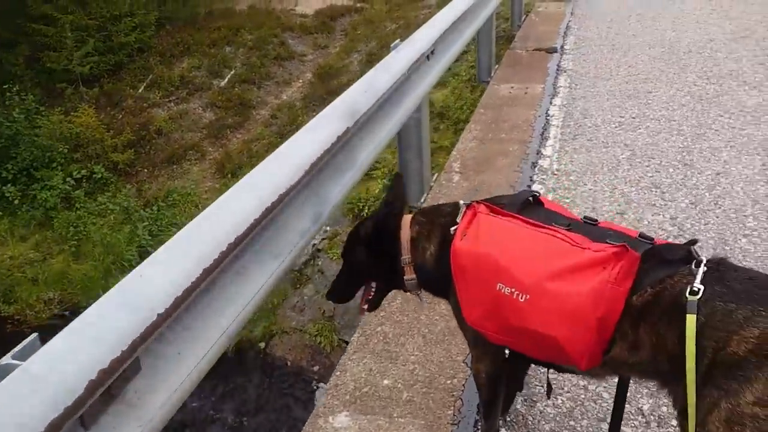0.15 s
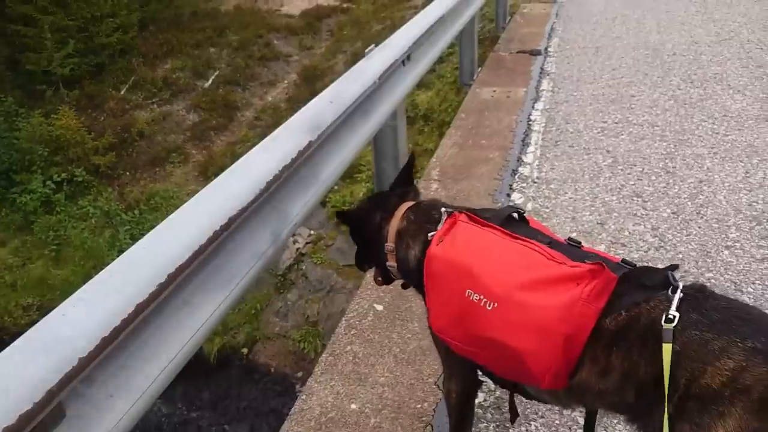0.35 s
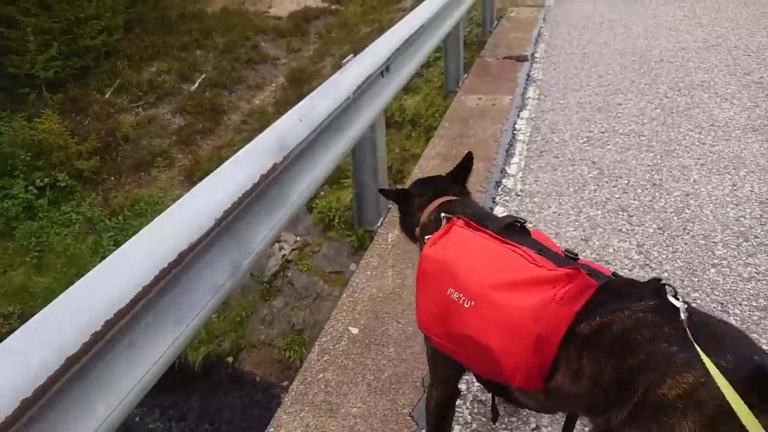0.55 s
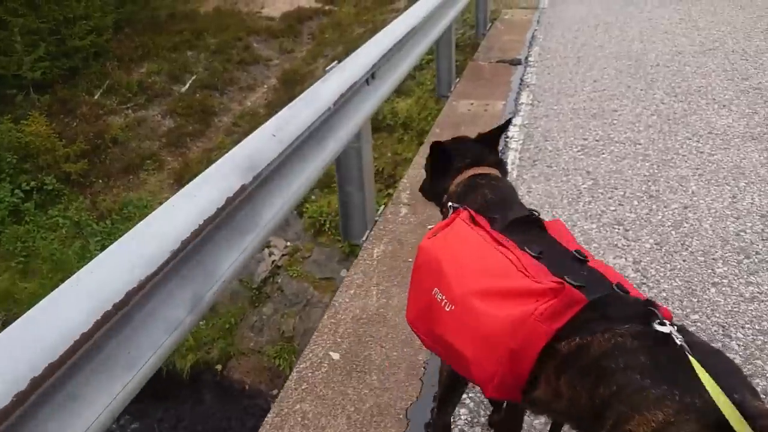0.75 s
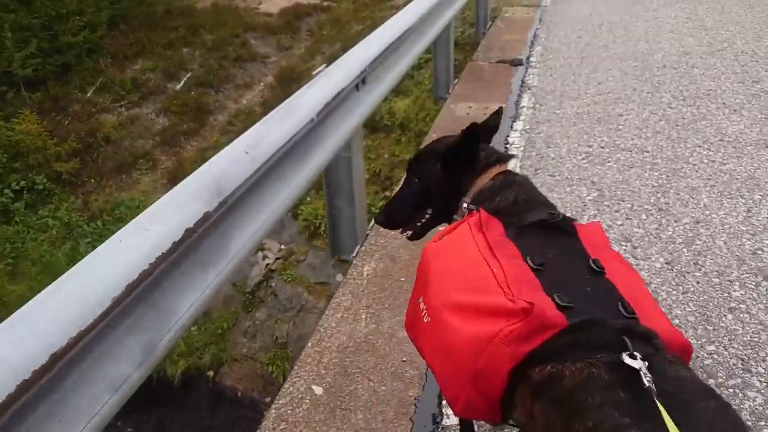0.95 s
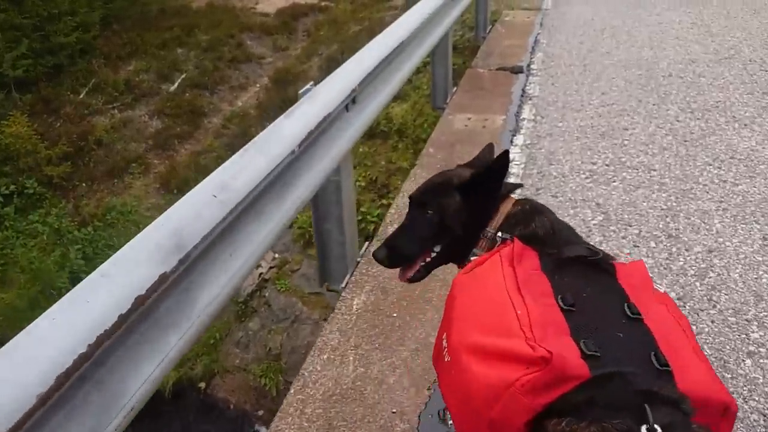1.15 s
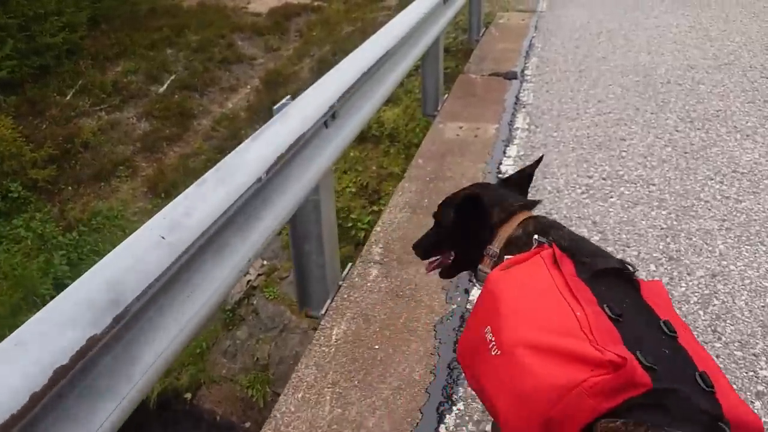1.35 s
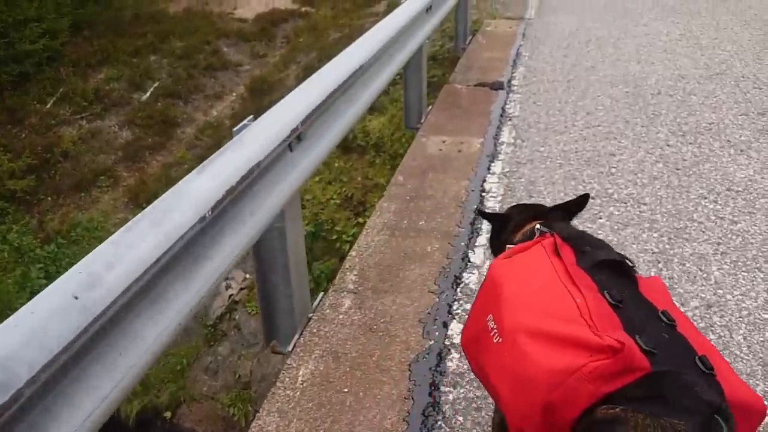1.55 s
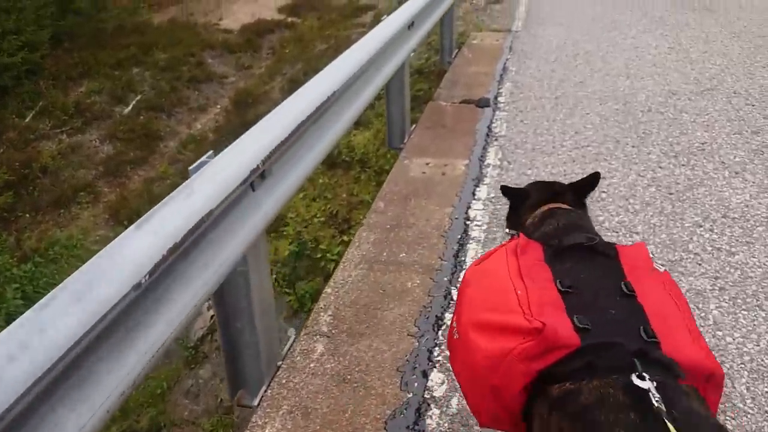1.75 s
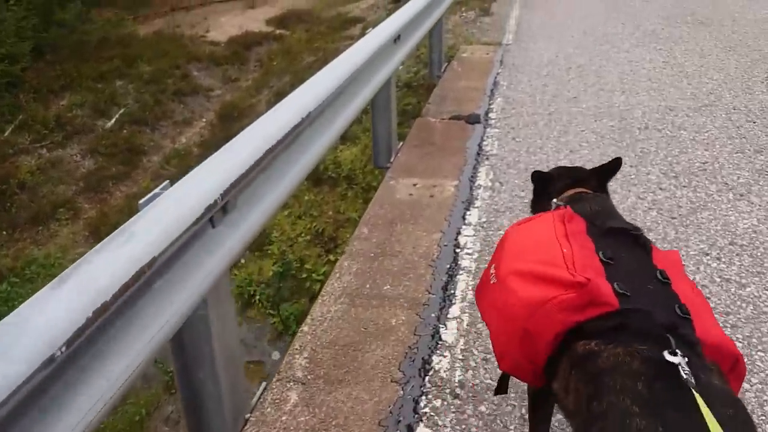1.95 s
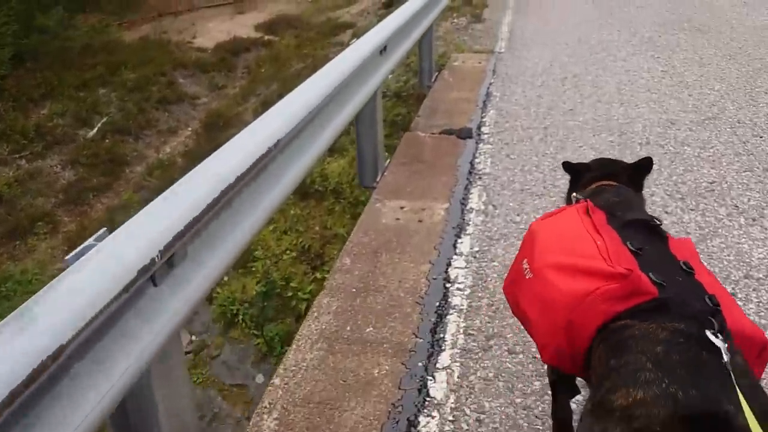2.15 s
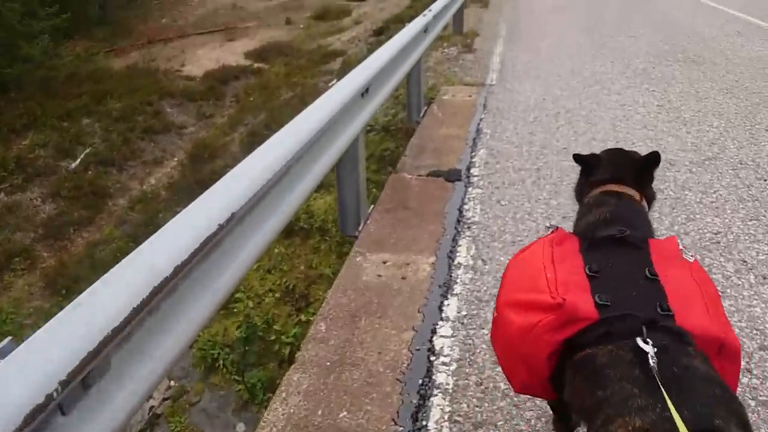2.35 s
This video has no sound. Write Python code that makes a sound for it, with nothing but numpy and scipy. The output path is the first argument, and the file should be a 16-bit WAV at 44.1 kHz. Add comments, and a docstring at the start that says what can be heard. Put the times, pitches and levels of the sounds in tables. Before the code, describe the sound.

A plastic leash ratchet rattles close on the right, then snaps once, over a quiet rushing stream

```python
"""A small stream rushes over stones below a roadside, left of a hand-held stereo microphone.
Its wash is patchy noise that reaches the left port first, with ringing bubbles and gulps of air.
Close on the right a plastic ratchet, probably the reel of a dog leash, rattles in two quick runs:
noise snaps, a ringing pawl and a knocked shell. Later its catch snaps once, with two early echoes.
Soft low bumps (damped tones) and faint rustles (treble puffs) come from walking and handling."""
import sys
import numpy as np
from scipy import signal
from scipy.fft import rfft, irfft
from scipy.io import wavfile
from scipy.ndimage import uniform_filter1d

SR = 44100
rng = np.random.default_rng(int(sys.argv[2]) if len(sys.argv) > 2 else 0)


def digitize_waveform(pressure):
    """Quantize a signal to 16-bit integers and store it at the path in sys.argv[1].

    Rows of a 2-D input are taken as channels; values are limited to [-1, 1].
    """
    field = np.atleast_2d(pressure).T
    bounded = np.clip(field, -1, 1)
    quanta = np.round(bounded * 32767).astype(np.int16)
    wavfile.write(sys.argv[1], SR, quanta)


N = 105840

# Stream spectrum at the microphone. Each row: frequency in Hz, relative level left in dB, right in dB.
STREAM_SPECTRUM = [(20, -5.5, -8), (50, -16, -6), (101, -25.5, -24.5), (170, -48, -38), (261, -12.5, -6.5),
                   (331, -2, 2.5), (478, -10, -4.5), (820, -1.5, -4), (1050, -9, -6.5), (1490, -7, -4.5),
                   (2410, -10, -8), (2920, -22, -10.5), (4100, -15, -11), (6140, -18.5, -17),
                   (6840, -64, -16), (7350, -27, -18.5), (8040, -32.5, -26.5), (8770, -23, -24.5),
                   (12500, -20.5, -23.5), (15800, -23, -26)]
# Swell of the water as the walker moves. Each row: time in seconds, gain in dB.
WATER_SWELL = [(0, 0), (.5, 1.5), (.65, -0.5), (1.05, -0.3), (1.35, 0.3), (1.5, 0.5), (1.74, 2.5),
               (1.85, 0.7), (2.05, 0.5), (2.25, 0.9), (2.4, -1.1)]
# Likeness of the stream at the two ports. Each row: frequency in Hz, likeness from 0 to 1.
PORT_LIKENESS = [(60, 0.02), (140, 0.54), (300, 0.93), (650, 0.55), (1400, 0.41), (3000, 0.35), (7000, 0),
                 (15000, 0)]
# Depth of the churning patches. Each row: frequency in Hz, depth in dB per standard deviation.
CHURN_DEPTH = [(50, -2), (350, 2), (900, 2.2), (2500, 1.4), (8000, 2.06), (15000, 3.3)]
STREAM_DB, STREAM_LEAD_S = -46, 0.00041  # the stream lies left: its left port leads

BUBBLES_PER_S, BUBBLE_CYCLES = 70, 14  # births over all sizes; cycles to age 1
BUBBLES_DB = -57

# Soft bumps of steps and handling.
# Each row: start in seconds, pitch in Hz, level at the right port in dB, fade time constant in seconds.
SOFT_BUMPS = [(0.171, 129, -41.5, 0.0093), (0.226, 141, -48.5, 0.021), (0.462, 96, -53, 0.009),
              (1.449, 155, -51.5, 0.0066), (1.512, 126, -50, 0.0081), (2.041, 174, -43, 0.016),
              (2.058, 116, -44.5, 0.0069), (2.095, 208, -47.5, 0.0093), (2.249, 48.5, -47.5, 0.022)]
BUMP_RISE_S, BUMP_LEFT_DB = 0.0083, -8

# Ratchet teeth. Each row: start in seconds, snap level in dB, knock level in dB re KNOCK_DB,
# extra treble in dB, pitch of the pawl's ring in Hz.
RATCHET_TEETH = [(.179, -19.5, -33, -14, 1360), (.208, -19, -16, -10, 1390), (0.2188, -23, -23, -18, 1340),
                 (0.2349, -15, -18, -7, 1340), (0.2426, -17.5, -32, -16, 1380),
                 (0.2551, -14.5, -16.5, -4.5, 1280), (0.2626, -20, -25, -8, 1280),
                 (.2733, -13.5, -16.5, -11, 1390), (0.2791, -21.5, -19.5, -7, 1280),
                 (0.2892, -18.5, -13.5, 4, 1410), (0.2967, -36, -37, -3, 1280),
                 (.304, -15.5, -19, -1, 1290), (0.317, -18.5, -14.5, 4.5, 1360),
                 (0.321, -22.5, -18, -6, 1660), (0.329, -19, -18, -14, 1430), (0.332, -24, -22.5, -4, 1430),
                 (.3405, -18, -22.5, -22, 1320), (.351, -15.5, -16.5, -1.5, 1430),
                 (.3606, -15.5, -14, -7, 1490), (0.3695, -15, -17, 7.5, 1375),
                 (0.3783, -12.5, -20, 3, 1510), (0.3867, -13.5, -24, 3.5, 1490),
                 (0.3958, -17, -13.5, 5, 1285), (.4048, -21, -15.5, -4, 1257),
                 (0.4275, -30, -21.5, 0, 1420), (0.435, -21.5, -19, 10, 1400), (.4413, -15, -15, 6, 1480),
                 (0.4492, -15, -19, 2, 1380), (0.4569, -17, -18, -13, 1110), (0.4657, -23, -26, 14, 1170),
                 (.4714, -40, -18, -3, 1216), (.5068, -29.5, -36, -25, 1350)]
# Colour of a tooth's snap. Each row: frequency in Hz, relative level left in dB, right in dB.
SNAP_COLOUR = [(101, -32, -37), (222, -36, -16), (430, -14, -4.5), (640, -14.5, -15), (900, -6.5, -0.5),
               (1900, -12.5, -6), (2600, -18, -2.5), (3650, -13.5, -3), (3650, -19.5, -11.5),
               (5580, -14.5, -3), (6240, -32, -6.5), (6740, -47, -4), (7550, -29, -5.5),
               (8100, -26.5, -13.5), (11340, -28, -14.5), (12200, -17, -4.5), (12400, -20, -23),
               (14600, -21, -7.5), (15800, -35, -19.5)]
SNAP_RISE_S, SNAP_FADE_S = 0.0012, 0.0011
SNAP_TAIL_DB, SNAP_TAIL_S, TAIL_TOP_HZ = -8, 0.0053, 7900
TREBLE_HZ = 8000  # half of a tooth's extra treble dB applies here
# Modes of the hollow plastic shell. Each row: mean pitch in Hz, central level at the right port in dB,
# t60 in seconds, left port relative to right in dB.
SHELL_MODES = [(424.6, -15.5, 0.06, -4.5), (785, -19.5, 0.061, -12), (986, -11, 0.05, -9),
               (1453, -12.5, 0.049, -6.5), (1678, -17, 0.031, 3), (2280, -14.5, 0.024, -2.5),
               (2810, -26, 0.018, -18), (3470, -23.5, 0.057, -6), (6714, -11, 0.012, -30)]
KNOCK_DB, KNOCK_RISE_S, KNOCK_LAG_S = -1.5, 0.0019, 0.000345  # the left port lags
KNOCK_SCATTER_HZ, KNOCK_SPREAD_DB = 26, 1.8  # standard deviations from tooth to tooth
PAWL_T60_S = 0.016
NEAR_LAG_S = 0.00041  # snaps and catch are on the right: the left port lags

# Scatter from the walker and the road
SCATTER_DB, SCATTER_T60_S, CATCH_SCATTER_DB = -15, 0.07, -16  # the last is the catch's send

# Gulps of water between the stones.
# Each row: start in seconds, starting pitch in Hz, level at the right port in dB.
WATER_GULPS = [(.522, 399, -44), (.553, 547, -35.5), (0.571, 354, -45), (.718, 399, -38.5),
               (.74, 598, -38.5), (.745, 1107, -33.5), (.858, 606, -41), (0.883, 339, -44.5),
               (1.118, 364, -44.5), (1.19, 283, -41), (1.223, 326, -40.5), (1.696, 388, -46),
               (1.735, 341, -37.5), (1.773, 418, -41.5), (1.872, 1846, -42.5), (2.021, 290, -41),
               (2.327, 1587, -44)]
GULP_RISE_S, GULP_FADE_S, GULP_LEFT_DB = 0.0029, 0.014, -2.5
GULP_GLIDE_PER_S = 0.98  # stretch of the phase; the pitch rises at twice this fraction

# Faint rustles of the dog's pack.
# Each row: start in seconds, level before the highpass in dB, fade time constant in seconds.
PACK_RUSTLES = [(.728, -48, .008), (.845, -44, 0.012), (.875, -61, .02), (.932, -49, .007)]
RUSTLE_HZ = 9000

# Modes of the catch, before its highpass. Each row: pitch in Hz, relative level at the right port in dB,
# t60 in seconds, left port relative to right in dB.
CATCH_MODES = [(1022, -2, 0.018, -32), (1230, -8.5, 0.0076, 3.5), (1830, -2.5, 0.0074, -10),
               (2275, -3, 0.013, -9.5), (3580, 0.5, 0.0033, -13), (4100, -9, 0.0069, -2),
               (4830, -3.5, 0.0092, -10.5), (6230, -10.5, 0.0062, -21), (7200, -6, 0.0068, -28),
               (13400, -11.5, 0.0034, -10)]
# The catch's snap and two quieter early echoes from nearby surfaces.
# Each row: start in seconds, level in dB.
CATCH_ECHOES = [(1.1665, -12), (1.1707, -24.5), (1.173, -25)]
CATCH_TICK_DB, CATCH_LOW_HZ = -17, 650  # tick is relative to the row's level

EDGE_HZ = 16050


def amp(db):
    """Decibels to gain."""
    return 10 ** (np.asarray(db) / 20)


def evened(x):
    """Scales to rms 1."""
    return x / np.sqrt(np.mean(x ** 2) + 1e-20)


def read(table, hz, axis=1):
    """Reads one column of a table over log frequency."""
    columns = np.transpose(table)
    return np.interp(np.log(hz + 1), np.log(columns[0] + 1), columns[axis])


def ports(table, hz):
    """Left and right dB of a table."""
    return np.array([read(table, hz, axis=1), read(table, hz, axis=2)])


def add(mix, s, sound):
    """Mixes a stereo sound in at time s."""
    part = mix[:, max(round(s * SR), 0):][:, :sound.shape[1]]
    part += sound[:, :part.shape[1]]


def colour(x, table, size=2048):
    """Causal minimum-phase filter for each port; the right one has unit energy."""
    log_gain = np.log(amp(ports(table, abs(np.fft.fftfreq(size, 1 / SR)))))
    spectrum = np.exp(np.conj(signal.hilbert(log_gain)))
    taps = np.fft.ifft(spectrum).real[:, :size // 2]
    return signal.oaconvolve(x, taps / np.linalg.norm(taps[1]), axes=1)[:, :N]


def highpass(x, hz, order=2):
    """Weakens what lies below hz."""
    return signal.sosfilt(signal.butter(order, hz, "high", fs=SR, output="sos"), x)


def swell(t, rise, fade):
    """Smooth rise to 1, then exponential fade."""
    attack = np.sin(np.pi / 2 * np.clip(t / rise, 0, 1)) ** 2
    return attack * np.exp(-np.maximum(t - rise, 0) / fade)


def ring(t, hz, t60, rise):
    """One struck mode, silent before t = 0."""
    return swell(t, rise, t60 / np.log(1000)) * np.sin(2 * np.pi * hz * t)


def rush(size=512, flicker_db=1.04):
    """Wash of the stream: churning patches of noise that reach the left port first."""
    hop = size // 4
    frames, hz = N // hop + 5, np.fft.rfftfreq(size, 1 / SR)
    a, b, c, d, patches = rng.standard_normal((5, frames, len(hz)))
    patches = uniform_filter1d(patches, size=10, axis=0)  # smooth in time
    patches = evened(uniform_filter1d(patches, size=4, axis=1))  # smooth in frequency
    flicker = evened(uniform_filter1d(rng.standard_normal(frames), size=4))[:, None]

    # The right port shares part of the left noise, delayed, and fills up with its own
    like = np.clip(read(PORT_LIKENESS, hz), 0, 1)
    left, own = a + 1j * b, c + 1j * d
    delayed = left * np.exp(-2j * np.pi * hz * STREAM_LEAD_S)
    right = like * delayed + np.sqrt(1 - like ** 2) * own

    level_db = ports(STREAM_SPECTRUM, hz)[:, None] + read(CHURN_DEPTH, hz) * patches + flicker_db * flicker
    spectra = np.array([left, right]) * amp(level_db)
    wash = signal.istft(spectra.transpose(0, 2, 1), nperseg=size, noverlap=size - hop)[1]
    return amp(STREAM_DB) * evened(wash[:, :N])


def bubbles(count=30, low_hz=520, high_hz=3500, glide=0.0566, slope_db=0.5, left_db=-3):
    """Small bubbles of many sizes ring briefly, each rising a little in pitch."""
    out = np.zeros((2, N))
    for hz in np.geomspace(low_hz, high_hz, count):
        turns = np.arange(0, 2 * BUBBLE_CYCLES, hz / SR)
        age = turns / BUBBLE_CYCLES
        ping = swell(age, 0.14, 0.96) * np.sin(2 * np.pi * turns * (1 + glide * age))
        births = (rng.random(N) < BUBBLES_PER_S / count / SR) * rng.uniform(0.43, 2.3, N)
        level_db = slope_db * np.log2(hz / low_hz)
        sound = amp(level_db) * signal.oaconvolve(births, ping)[:N]
        lag = round(STREAM_LEAD_S * SR * rng.uniform(0.54, 0.9))
        out += [amp(left_db) * sound, np.roll(sound, lag)]
    return amp(BUBBLES_DB) * evened(out)


def bumps():
    """Dull, well-damped thuds: low tones that fade at once."""
    out, t = np.zeros((2, N)), np.arange(SR // 6) / SR
    for s, hz, db, fade in SOFT_BUMPS:
        thud = swell(t, BUMP_RISE_S, fade) * np.sin(2 * np.pi * hz * t)
        add(out, s, amp([[db + BUMP_LEFT_DB], [db]]) * thud)
    return out


def shell_knock(t, pawl_hz):
    """One knock: the pawl rings with the shell's modes, whose pitch and level scatter."""
    knock = ring(t, pawl_hz, PAWL_T60_S, KNOCK_RISE_S)
    scatters = rng.standard_normal((len(SHELL_MODES), 2))
    for (hz, db, t60, left_db), (detune, strength) in zip(SHELL_MODES, scatters):
        mode = ring(t, hz + KNOCK_SCATTER_HZ * detune, t60, KNOCK_RISE_S)
        knock = knock + amp(db + KNOCK_SPREAD_DB * strength) * amp([[left_db], [0]]) * mode
    return knock


def ratchet():
    """Each tooth snaps past the pawl, which rings at a shifting pitch, and knocks the hollow shell."""
    snaps, knocks, t = np.zeros((2, N)), np.zeros((2, N)), np.arange(SR // 16) / SR
    late, knock_t = np.array([t - NEAR_LAG_S, t]), np.array([t - KNOCK_LAG_S, t])
    crack = swell(late, SNAP_RISE_S, SNAP_FADE_S)
    tail = amp(SNAP_TAIL_DB) * swell(late, SNAP_RISE_S, SNAP_TAIL_S)
    hz = np.fft.rfftfreq(len(t), 1 / SR)
    treble = hz ** 2 / (hz ** 2 + TREBLE_HZ ** 2)
    dull = 1 / np.sqrt(1 + (hz / TAIL_TOP_HZ) ** 10)  # lowpass of the tail
    for s, snap_db, knock_db, treble_db, pawl_hz in RATCHET_TEETH:
        noise = rng.choice([-1, 1], (2, 2, len(t)))
        grit, after = rfft(noise) * amp(treble_db * treble)
        snap = crack * irfft(grit, len(t)) + tail * irfft(after * dull, len(t))
        add(snaps, s, amp(snap_db) * snap)
        add(knocks, s, amp(KNOCK_DB + knock_db) * shell_knock(knock_t, pawl_hz))
    return colour(snaps, SNAP_COLOUR) + knocks


def scatter(x, onset_s=0.0041):
    """Short open-air tail from nearby surfaces: fading noise convolved with the sound."""
    t = np.arange(SR // 5) / SR
    tail = rng.standard_normal((2, len(t))) * swell(t, onset_s, SCATTER_T60_S / np.log(1000))
    return amp(SCATTER_DB) * signal.oaconvolve(x, tail / np.linalg.norm(tail[1]), axes=1)[:, :N]


def gulps():
    """Pockets of air ring between the stones, rising in pitch as they fade."""
    out, t = np.zeros((2, N)), np.arange(SR // 8) / SR
    late = np.array([t, t - STREAM_LEAD_S])
    for s, hz, db in WATER_GULPS:
        turns = hz * late * (1 + GULP_GLIDE_PER_S * late)
        tone = swell(late, GULP_RISE_S, GULP_FADE_S) * np.sin(2 * np.pi * turns)
        add(out, s, amp([[db + GULP_LEFT_DB], [db]]) * tone)
    return out


def rustles(rise_s=0.004):
    """Nylon brushing: thin puffs of treble noise."""
    out, t = np.zeros((2, N)), np.arange(SR // 8) / SR
    for s, db, fade in PACK_RUSTLES:
        puff = swell(t, rise_s, fade) * rng.standard_normal((2, len(t)))
        add(out, s, amp(db) * puff)
    return highpass(out, RUSTLE_HZ)


def catch(rise_s=0.00024, tick_s=0.0011):
    """One dry plastic snap with two quieter early echoes; the part is too small to radiate bass."""
    out, t = np.zeros((2, N)), np.arange(SR // 20) / SR
    late = np.array([t - NEAR_LAG_S, t])
    snap = amp(CATCH_TICK_DB) * swell(late, rise_s, tick_s) * rng.standard_normal(late.shape)
    for k, (hz, db, t60, left_db) in enumerate(CATCH_MODES):
        sign = (-1) ** k  # neighbouring modes start in opposite directions
        snap = snap + sign * amp([[db + left_db], [db]]) * ring(late, hz, t60, rise_s)
    for s, db in CATCH_ECHOES:
        add(out, s, amp(db) * snap)
    return highpass(out, CATCH_LOW_HZ, order=3)


def scene():
    """The stream behind, the leash in front."""
    swell_db = np.interp(np.arange(N) / SR, *np.transpose(WATER_SWELL))
    water = (rush() + bubbles()) * amp(swell_db)
    rattle, snap = ratchet(), catch()
    open_air = scatter(rattle + amp(CATCH_SCATTER_DB) * snap)
    return water + bumps() + rattle + open_air + gulps() + rustles() + snap


def record(dry):
    """The recorder's band limit: a steep lowpass."""
    taps = signal.firwin(511, EDGE_HZ, window=("kaiser", 9), fs=SR)
    return signal.oaconvolve(dry, taps[None], "same")


dry = scene()
out = record(dry)
digitize_waveform(out)
```